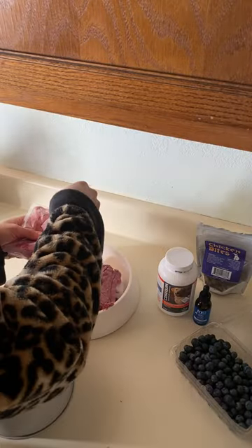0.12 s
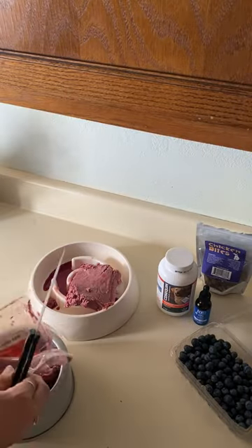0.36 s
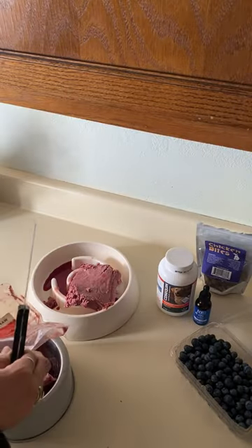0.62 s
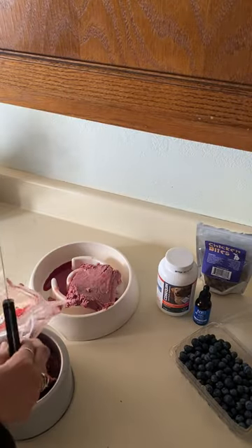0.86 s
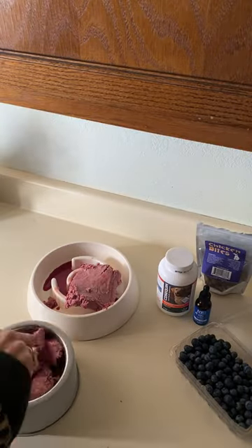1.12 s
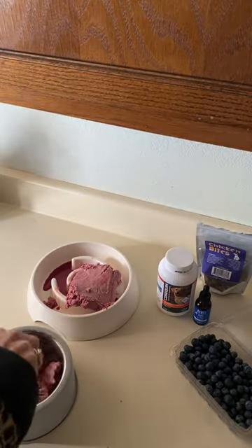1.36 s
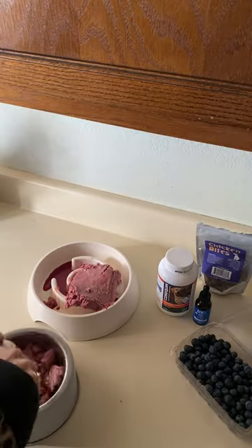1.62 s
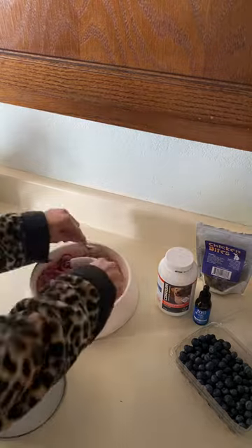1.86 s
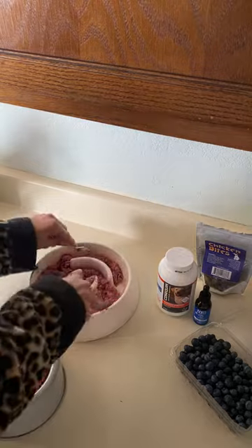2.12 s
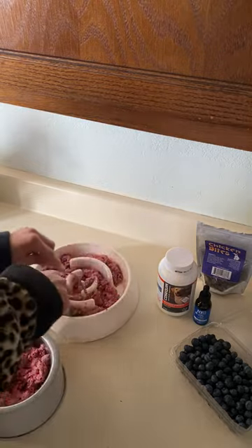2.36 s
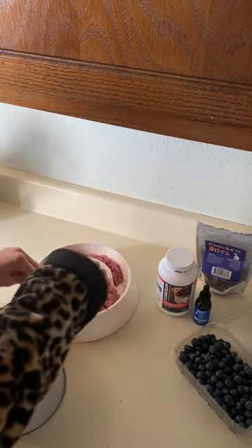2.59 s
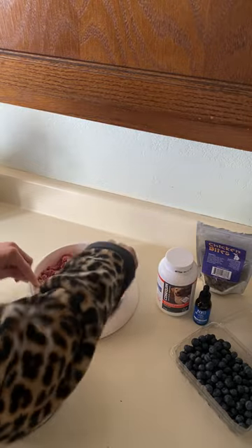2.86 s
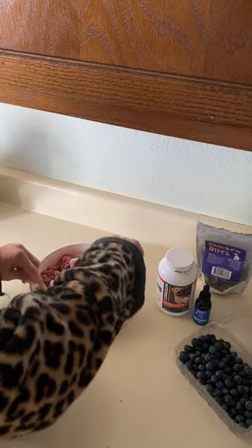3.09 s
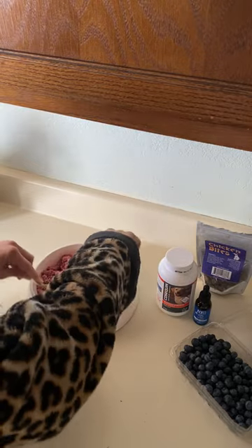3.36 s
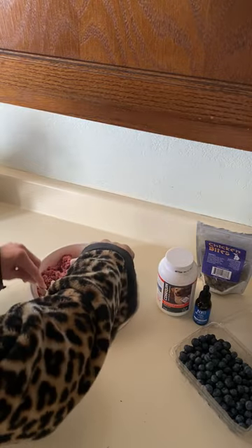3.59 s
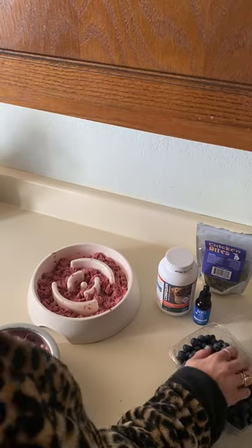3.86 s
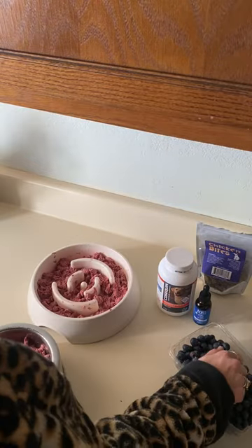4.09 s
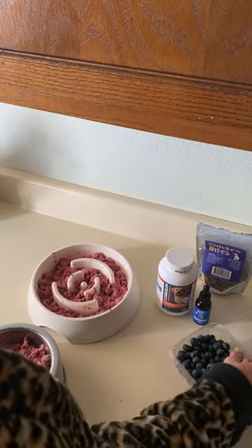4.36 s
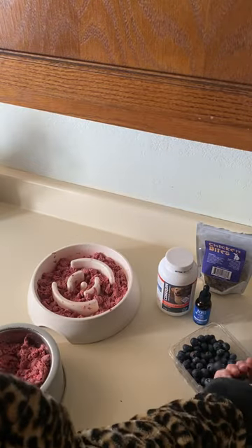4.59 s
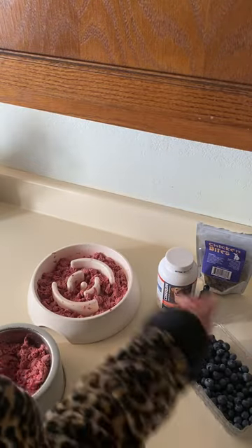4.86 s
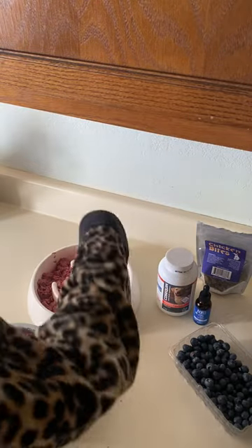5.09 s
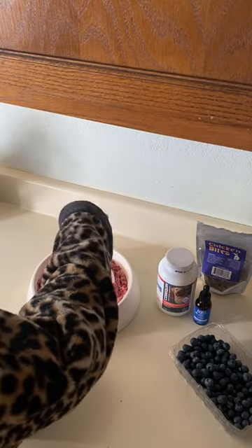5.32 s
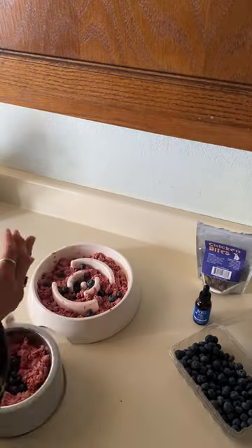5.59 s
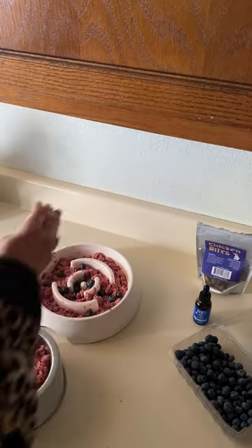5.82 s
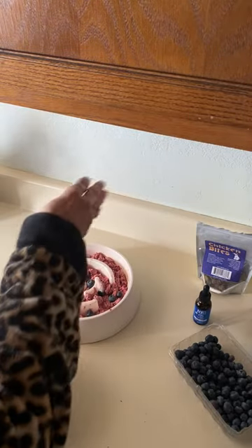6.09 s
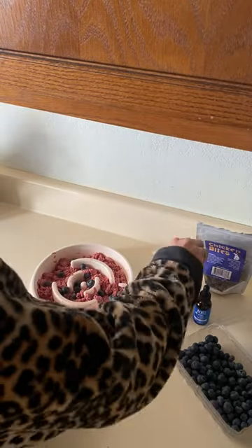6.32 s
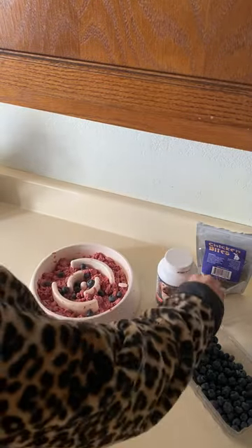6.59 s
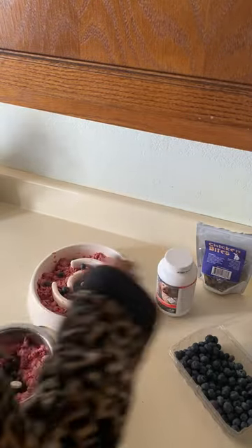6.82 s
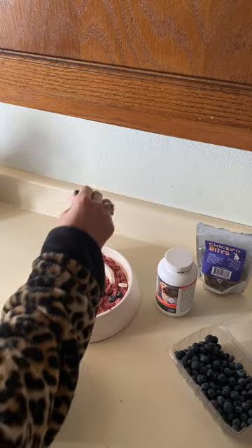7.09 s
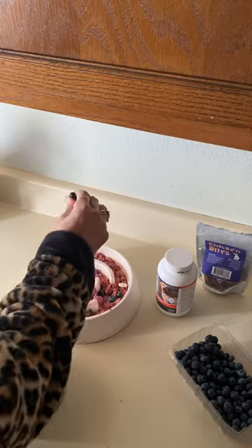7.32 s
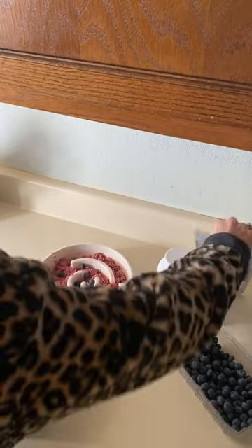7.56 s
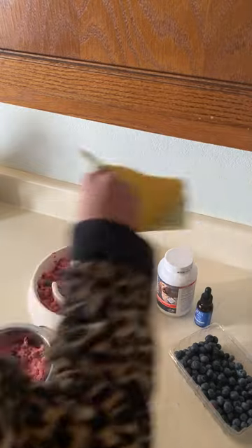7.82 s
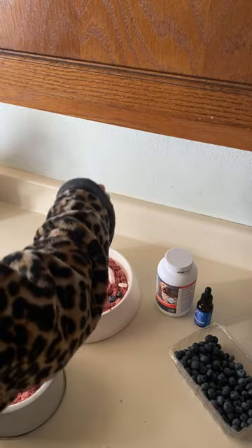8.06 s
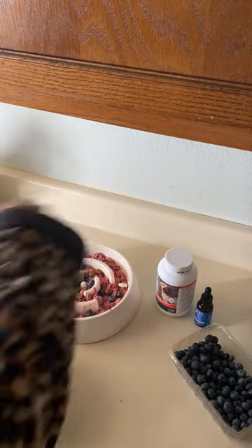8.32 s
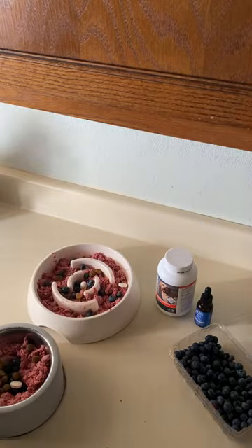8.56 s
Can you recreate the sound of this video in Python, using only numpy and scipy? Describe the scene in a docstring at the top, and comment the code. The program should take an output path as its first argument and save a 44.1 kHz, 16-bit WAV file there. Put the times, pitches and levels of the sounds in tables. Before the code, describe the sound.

Close stereo handling on a kitchen counter: soft food is pressed with small crackles and rings into a steel bowl, then a busy run of heavier thudding knocks in a ceramic bowl. A quiet gap follows, then scattered clacks and rustles of jars and pouches. A low appliance hum wavers and jumps in level; a waiting dog whistles faintly through its nose.

```python
"""Food is broken up and pressed into a steel, then a ceramic bowl on a kitchen counter, close to the microphone;
jars and pouches follow. Presses and rubs are streams of tiny contacts, knocks are sudden noise bursts with
a crack; both ring the object in hand, and a dull tail of the kitchen surrounds them.
A waiting dog whistles faintly through its nose (gliding tones); behind it an appliance hums (two wavering
lines) over room noise, rumble and dull thumps through the counter. The microphone is stereo and hisses."""
import sys
import numpy as np
from scipy import signal
from scipy.fft import rfft, irfft, next_fast_len
from scipy.io import wavfile
from scipy.ndimage import uniform_filter1d, map_coordinates

SR = 44100
rng = np.random.default_rng(int(sys.argv[2]) if len(sys.argv) > 2 else 0)


def wrap_up_sound(samples):
    """Save the sound to the file named by the first command line argument, as 16-bit audio."""
    columns = np.atleast_2d(samples).T
    # keep every value between -1 and 1, then stretch to whole-number steps
    tamed = np.clip(columns, -1, 1)
    steps = np.round(tamed * 32767).astype(np.int16)
    wavfile.write(sys.argv[1], SR, steps)


def nominal_scale(level):
    """Amplitude ratio for a level in decibels (scalar or array-like)."""
    x = np.asarray(level, float) / 20
    return 10 ** x


N = 383214   # samples
SIZE = next_fast_len(N + SR // 2)
HZ = np.fft.rfftfreq(SIZE, 1 / SR)
RING = 4096   # longest ringing of an object, in samples
RING_HZ = np.fft.rfftfreq(RING, 1 / SR)

RISE_DB, FALL_DB = 28, 30.5   # depth of swell and fall
RISE_BEND, FALL_BEND = 1.6, 1.07   # above 1 rounds the top
GRIP_S, LET_GO_S = 0.0078, 0.052   # rise and fall of a rub
DULLING_DB = 9   # scratch lost over the fall

# presses that swell and die away:
# (peak time [s], rise [s], fall [s], body level at the peak [dB], scratch before dulling [dB re body])
PRESSES = [(0.018, 0.036, 0.11, -63, -11), (0.179, 0.034, 0.049, -49, 0), (0.251, 0.028, 0.16, -66, -8.5),
           (0.423, 0.055, 0.078, -60.5, -6.5), (1.06, .015, 0.19, -64.5, -14), (1.15, 0.023, 0.14, -75, -3),
           (1.299, 0.046, 0.2, -39.5, 2), (1.592, 0.031, 0.24, -49, -11.5),
           (1.782, 0.029, 0.11, -51.5, -7.5), (1.864, 0.028, 0.11, -40.5, -7),
           (2.033, 0.04, 0.057, -37.5, -3), (2.779, 0.027, 0.11, -26, -13),
           (2.937, 0.031, 0.14, -31.5, -13), (3.102, 0.019, 0.095, -27.5, -13.5),
           (3.278, 0.036, 0.096, -26, -12.5), (3.461, 0.028, 0.097, -25.5, -15.5),
           (3.622, .035, .08, -44, 10), (3.643, .03, 0.086, -26, -17), (3.803, 0.025, 0.11, -33.5, -4),
           (5.424, 0.041, 0.17, -57.5, -35), (6.026, 0.029, .1, -63, -21.5),
           (6.157, 0.017, 0.059, -46.5, 11), (6.676, 0.041, 0.11, -34.5, -21.5),
           (7.03, .03, 0.054, -72.5, -30.5), (7.393, .03, 0.08, -78.5, 12), (7.629, 0.056, 0.1, -46, 2),
           (8.347, .03, 0.16, -55.5, 4.5), (8.57, 0.066, 0.15, -43, -0.1)]
# steady rubbing and rustling:
# (start time [s], length [s], body level [dB], scratch before dulling [dB re body])
RUBBINGS = [(1.207, 0.0548, -59.5, -5), (1.276, .02, -43.5, -4.5), (1.425, 0.14, -80, 1),
            (1.865, 1.954, -55.5, -18.5), (2.151, 0.076, -42.5, -4.5), (2.254, 0.14, -38, -10.5),
            (2.541, 0.034, -34, 0), (2.597, 0.041, -35, -18.5), (3.934, 0.356, -78.5, -4),
            (4.385, 0.21, -84, -0.5), (7.72, .26, -67, -5), (8.064, 0.057, -64, -16)]


def gestures():
    """Start [s], body [dB] and scratch [dB re body] of each press and rub: the hand bears down, then lets go."""
    for peak_s, rise_s, fall_s, db, scratch_db in PRESSES:
        t = np.arange(-min(1.3 * rise_s, peak_s), 1.4 * fall_s, 1 / SR)
        ahead = np.maximum(-t, 0) / rise_s
        fallen = np.maximum(t, 0) / fall_s
        body_db = db - RISE_DB * ahead ** RISE_BEND - FALL_DB * fallen ** FALL_BEND
        yield peak_s + t[0], body_db, scratch_db - DULLING_DB * fallen
    for start_s, length_s, db, scratch_db in RUBBINGS:
        t = np.arange(-GRIP_S, length_s + 1.4 * LET_GO_S, 1 / SR)
        fallen = np.maximum(t - length_s, 0) / LET_GO_S
        body_db = db + RISE_DB * np.minimum(t, 0) / GRIP_S - FALL_DB * fallen
        yield start_s + t[0], body_db, scratch_db - DULLING_DB * fallen


# the spot under the hand: (from time [s], hollow pitch [Hz],
# clack of a press or rub [dB re the middle of body and scratch], air before trims [dB re scratch])
HAND_SPOTS = [(0.0, 410, -5, 3), (0.13, 1340, -0.5, -13.5), (0.22, 424, -1, 2), (0.38, 2170, -6, -22.5),
              (0.7, 480, 8, -24), (0.85, 410, 0, -7), (1.19, 460, -16, -1.5), (1.25, 1600, 1, -2),
              (1.34, 1820, -8, -4), (1.41, 1200, -5, 1), (1.73, 410, -8, 2.5), (1.83, 455, -9, -8),
              (2.13, 1800, -1, -10.5), (2.24, 1300, -0.8, -12.5), (2.42, 1220, 0, -9.5),
              (2.52, 2510, -1, -6.5), (2.74, 1020, -3.5, -5.5), (3.23, 650, -6, -8),
              (3.33, 1230, -0.5, -12.5), (3.42, 660, -4, -8), (3.55, 4255, -19.5, -6),
              (3.6, 655, -18, -7.5), (3.66, 975, -2.5, -9), (3.75, 4300, -14, -6), (3.92, 423, -3, -0.3),
              (5.3, 598, -9, -7), (5.95, 419, 1, 9), (6.12, 5070, 0, -27.5), (6.19, 2350, -2.5, -20),
              (6.6, 1017, 1, -11), (6.95, 418, -5.5, 24), (7.3, 2130, 6.5, -9), (7.5, 2000, 1.5, 1.54),
              (7.7, 430, -0.5, -6.5), (8.04, 2410, 10.5, -12), (8.3, 1900, 6.5, -21.5),
              (8.47, 389.8, -2.5, -2)]


def spot_at(s):
    """Hollow pitch [Hz], clack [dB] and air [dB] of the spot touched at a moment."""
    starts = [row[0] for row in HAND_SPOTS]
    return HAND_SPOTS[max(np.searchsorted(starts, s, "right") - 1, 0)][1:]


THUD_DB, THUD_FOLLOWS = -41.5, 0.97   # thud at a body level of -40 dB; share of the body's swing
THUD_LAG_S = 0.0073   # the heavy bowl answers late
AIR_FOLLOWS = 0.2   # air swings further than scratch by this share of the body's swing


def strokes(per_s, spread_db, lumpy_db):
    """Presses and rubs: a stream of tiny contacts, as strong as the hand presses, with lumps in each range."""
    sizes = nominal_scale(spread_db * np.minimum(rng.exponential(1, N), 4)) * rng.choice([-1, 1], N)
    grains = rms_one(sizes * (rng.random(N) < per_s / SR))
    together = drift(80)
    lumps = nominal_scale(lumpy_db * np.array([together + drift(35) for _ in range(5)]))
    lumps[0] = np.sqrt(lumps[0])   # the heavy bowl evens out the thud
    out = np.zeros((2, N))
    for s, body_db, scratch_db in gestures():
        at = np.arange(round(s * SR), min(round(s * SR) + len(body_db), N))
        hollow_hz, clack_db, air_db = spot_at(s + GRIP_S)
        thud_db = THUD_DB + THUD_FOLLOWS * (body_db + 40) - body_db
        # thud, body, clack, scratch, air
        balance_db = np.array([thud_db, 0 * body_db, scratch_db / 2 + clack_db, scratch_db, scratch_db + air_db])
        pressure = nominal_scale(body_db + balance_db)[:, :len(at)]
        pressure[0] = np.interp(at - THUD_LAG_S * SR, at, pressure[0], left=0)
        pressure[4] *= nominal_scale(AIR_FOLLOWS * (body_db - body_db.max()))[:len(at)]
        force = pressure * lumps[:, at] * signal.windows.tukey(len(at), .1) * grains[at]
        # food and fingers widen the resonances while rubbing
        touch(out, at[0], force, hollow_hz, spot_db=2.5, broad_db=0.5, damping=2.5)
    return out


RATTLE_T60_S = .025   # a short rattle, then a weaker shudder
SHUDDER_DB, SHUDDER_THUD_DB = -12.5, 4   # shudder re rattle; its extra thud
KNOCK_AIR_DB = -1   # a knock has less air than a rub on the same spot

# knocks: (time [s], body strength before the common trim [dB],
# clack [dB re body], scratch [dB re body], shudder t60 [s])
KNOCK_BLOWS = [(0.067, -29, -17.5, -39, .2), (0.403, -51, 9.5, 0.5, .05), (0.478, -62, -24, -25, .05),
               (0.605, -61.5, -32, -3, 0.046), (0.731, -43.5, -6, -19, 0.16), (0.869, -59, 4, -6, 0.15),
               (1.351, -18, 1, 2, 0.15), (1.861, -26.5, -10.5, -1.5, 0.055),
               (2.011, -21.5, -33, -14.5, 0.11), (2.168, -28, -33, -9, 0.057),
               (2.314, -12, -12, -23, 0.067), (2.35, -31.5, 8, -27, .1), (2.434, -18, -10.5, -15, 0.16),
               (2.585, -25.5, -11, 5.5, .1), (2.778, -11.5, -31, -15.5, 0.051),
               (2.979, -15.5, -11.5, -26.5, 0.16), (3.1, -19, -32, -30.5, 0.13),
               (3.277, -19, -30, -23.5, 0.075), (3.339, -6.5, -13.5, -22, 0.14),
               (3.462, -16.5, -26.5, -10.5, 0.064), (3.672, -7, -11, -25, .13), (3.8, -35, -6, -5.5, .06),
               (4.807, -61, -22.5, -7.5, 0.08), (4.994, -64, -26.5, -11, .05),
               (5.416, -42, -28.5, -31.5, 0.088), (6.163, -15.5, -13.5, 1.5, .2),
               (6.197, -35, 19.5, -14.5, 0.11), (6.254, -43.5, 12, 6, 0.22), (6.287, -50, 6, 7, .15),
               (6.36, -60.5, 4, 4, 0.11), (7.755, -48.5, 1, -18, .06), (7.796, -37.5, -25, -27, .05),
               (7.846, -38.5, -9, -9.5, 0.15), (7.896, -43.5, -2, -3.5, 0.041), (7.954, -43.5, -8, -5, .08),
               (8.081, -37.5, 0.5, -15, 0.042), (8.15, -39, 6, -31, 0.13), (8.345, -35, 17.5, 2.5, 0.058),
               (8.578, -26.5, -25, -12.5, .05), (8.671, -23, -14.5, 1, 0.12)]


def knocks(crack_db, thud_db, knock_db):
    """The contact builds up for a moment, cracks, rattles out and shudders on."""
    out = np.zeros((2, N))
    since = np.arange(SR // 4) / SR
    for s, body_db, clack_db, scratch_db, shudder_t60_s in KNOCK_BLOWS:
        noise = rng.standard_normal(len(since)) * (1 - np.exp(-since / .002))
        blow = noise * nominal_scale(-60 * since / RATTLE_T60_S)
        blow *= 1 + 0.29 * np.exp(-since / 0.00053)   # extra weight in the first moments
        blow[50] = nominal_scale(crack_db)   # the crack is one sample, about 1 ms in
        heavier_db = np.array([[SHUDDER_THUD_DB], [0], [0], [0], [0]])
        shudder = noise * nominal_scale(SHUDDER_DB - 60 * since / shudder_t60_s + heavier_db)
        hollow_hz, _, air_db = spot_at(s)
        air_db = scratch_db + air_db + KNOCK_AIR_DB
        strength = nominal_scale(knock_db + body_db + np.array([[thud_db], [0], [clack_db], [scratch_db], [air_db]]))
        force = strength * (blow + shudder)
        # a knock leaves the resonances sharper than a rub
        touch(out, round(s * SR), force, hollow_hz, spot_db=7.5, broad_db=2, damping=1.4)
    return out


SECOND_BOWL_S, JARS_S = 1.99, 3.935   # when the hand moves on

# the objects on the counter, each with its broad colour: (frequency [Hz], relative level per Hz [dB])
# and its resonances: (frequency [Hz], width before damping [Hz], level before damping and spot [dB])
STEEL_BOWL_COLOUR = [(18, -46.5), (30, -16.5), (467, -1.5), (1510, -10.5), (1870, -9), (2990, -19),
                     (8950, -22.5), (15500, -33)]
STEEL_BOWL_RESONANCES = [(460, 34, 1), (887, 56, 3), (2050, 55, -6), (3400, 73, -7), (4170, 110, -3.5),
                         (5440, 73, -2), (6334, 150, -7.5), (7700, 18, -8), (9500, 97, -15),
                         (11120, 230, -10.5)]
CERAMIC_BOWL_COLOUR = [(18, -34), (30, -4), (546, -10.5), (673, -3.5), (767, -7.5), (1020, -5.5),
                       (1770, -19), (5740, -26.5), (15500, -35.5)]
CERAMIC_BOWL_RESONANCES = [(108, 25, 0.5), (430, 50, -4.5), (700, 31, -11), (1024, 40, -5),
                           (2060, 180, -14.5), (2410, 60, -8.5), (2530, 49, -13.5), (3500, 46, -29),
                           (3980, 34, -11), (5630, 180, -18), (5680, 390, -13.5), (10655, 1400, -18)]
JARS_COLOUR = [(18, -46.5), (30, -5.5), (432, -6), (492, 4), (1050, 5), (4660, -16.5), (5040, -20),
               (15500, -44)]
JARS_RESONANCES = [(436, 60, 10), (637, 25, 12.5), (1390, 92, -7.5), (1640, 110, -2), (2210, 170, -2.5),
                   (2650, 11, -14), (3010, 16, -19.5), (3450, 71, -15), (5330, 47, -5.5)]


def object_in_hand(s):
    """Colour and resonances of what is touched: steel bowl, ceramic bowl, then jars and pouches."""
    if s <= SECOND_BOWL_S:
        return STEEL_BOWL_COLOUR, STEEL_BOWL_RESONANCES
    if s <= JARS_S:
        return CERAMIC_BOWL_COLOUR, CERAMIC_BOWL_RESONANCES
    return JARS_COLOUR, JARS_RESONANCES


def ranges(edges_hz=(400, 1500, 2800, 7000)):
    """Power shares of five ranges: thud, body, clack, scratch, air."""
    below = [0] + [1 / (1 + (RING_HZ / hz) ** 12) for hz in edges_hz] + [1]
    return np.array([high - low for low, high in zip(below, below[1:])])


def ring_of(at, hollow_hz, spot_db, broad_db, damping):
    """Impulse response of the object in each range, energy 1; every spot favours other resonances."""
    colour, resonances = object_in_hand(at / SR)
    hz, width_hz, db = np.transpose(resonances)[:, :, None]
    favour, detune = rng.standard_normal((2, len(resonances), 1))
    damped_db = 1.2 * damping * np.log2(1 + hz / 2000)
    height = nominal_scale(2 * (db + spot_db * np.minimum(favour, 1) - damped_db))
    away = 2 * (RING_HZ - hz * (1 + .02 * damping * detune)) / (damping * width_hz)
    peaks = height / (1 + away ** 2) ** 2
    power = nominal_scale(2 * (over_hz(colour, RING_HZ) + broad_db)) + peaks.sum(axis=0)
    # the hollow pitch adds 8 dB re the power already there
    power = power * (1 + nominal_scale(2 * 8) * np.exp(-(np.log((RING_HZ + 1) / hollow_hz) / 0.062) ** 2))
    response = causal(np.sqrt(power * ranges()))
    return response / np.linalg.norm(response, axis=1, keepdims=True)


# balance of the near sounds at the microphone: (frequency [Hz], left minus right [dB])
NEAR_BALANCE = [(60, 0.0), (180, 0.0), (550, 3.0), (1650, 0.5), (4970, -0.5), (15000, 0.0)]


def touch(add, at, force, hollow_hz, spot_db, broad_db, damping):
    """One touch: the force of each range rings the object in hand, heard close by at both microphone ports."""
    response = ring_of(at, hollow_hz, spot_db, broad_db, damping)
    sound = signal.fftconvolve(force, response, axes=1).sum(axis=0)
    # counter and wall close by reach the two ports differently
    alike = likeness(RING_HZ)
    differing = np.sqrt((1 - alike) / 2) * dying_noise(0.0087, RING) * [[1], [-1]]
    ports = np.sqrt((1 + alike) / 2) + differing
    ports = irfft(ports * nominal_scale(over_hz(NEAR_BALANCE, RING_HZ) / 2 * [[1], [-1]]), RING)
    # shifted to keep the part ahead of time zero, then shifted back
    ports = np.roll(ports, RING // 4, axis=1)[:, :RING * 5 // 8]
    heard = signal.fftconvolve(sound[None], ports, axes=1)[:, RING // 4:]
    add[:, at:at + heard.shape[1]] += heard[:, :N - at]


def kitchen(near, t60, wall_hz):
    """The kitchen's dull, dying cloud of reflections, alike at both ports in the bass."""
    alike = likeness(HZ)
    common = np.sqrt(1 + alike) * dying_noise(t60, SIZE)
    differing = np.sqrt(1 - alike) * dying_noise(t60, SIZE) * [[1], [-1]]
    walls = 1 / (1 + 1j * HZ / wall_hz)   # treble is lost
    return irfft(rfft(near.mean(axis=0), SIZE) * (common + differing) * walls, SIZE)[:, :N]


# the dog's nasal whistles: (start time [s], length [s], first pitch [Hz], last pitch [Hz],
# rms level before flutter and left-right balance [dB])
NOSE_WHISTLES = [(0.215, 0.17, 5750, 5070, -88), (1.633, 0.059, 4800, 4770, -73),
                 (1.703, 0.065, 7500, 7400, -83), (6.42, 0.066, 5930, 5680, -84),
                 (6.522, 0.18, 6900, 7430, -88), (6.69, .15, 7900, 6800, -89)]


def whistles():
    """The dog's nose: a slightly rough, thin tone that glides, a little to the left."""
    out, waver, flutter = np.zeros(N), drift(120), drift(120)
    for s, length_s, first_hz, last_hz, db in NOSE_WHISTLES:
        at = np.arange(round(s * SR), round((s + length_s) * SR))
        pitch_hz = np.linspace(first_hz, last_hz, len(at)) + 40 * waver[at]
        phase = 2 * np.pi * np.cumsum(pitch_hz) / SR
        level = np.sqrt(2) * nominal_scale(db + 2.4 * flutter[at])
        out[at] = level * np.sin(phase) * signal.windows.tukey(len(at), .6)
    return out * nominal_scale([[1.5], [-1.5]])


# background, one table for each stretch between jumps in level:
# (time [s], hum level before a 3 dB lift [dB])
BACKGROUND_STRETCHES = [
    [(0.0, -53), (0.21, -56.5), (0.3, -59), (1.14, -56.5), (1.83, -57.5), (2.9, -56.5), (3.93, -55.5)],
    [(3.93, -61), (4.226, -68), (4.864, -76.5), (5.06, -67), (5.298, -71.5), (5.454, -75.5), (5.68, -68.5)],
    [(5.68, -58), (6.4, -56.5), (6.86, -58.5), (7.06, -56.5)],
    [(7.06, -67), (7.55, -75.5)],
    [(7.55, -56), (7.964, -56.5), (8.45, -64.5), (8.69, -59.5)],
]


def background_level():
    """Level of the background [dB]: it drifts within a stretch and jumps between stretches."""
    level_db = np.full(N, -80.)
    for stretch in BACKGROUND_STRETCHES:
        s, db = np.transpose(stretch)
        at = np.arange(max(round(s[0] * SR), 0), min(round(s[-1] * SR), N))
        level_db[at] = np.interp(at / SR, s, db)
    return uniform_filter1d(level_db, size=400)


# room noise and rumble at a background level of -57 dB, and their shares of its swing
NOISE_DB, NOISE_FOLLOWS, RUMBLE_DB, RUMBLE_FOLLOWS = -60.5, .55, -62.5, .9
THUMP_S = 0.045   # time from a thump's peak to 1/e

# appliance hum: (frequency [Hz], relative level [dB])
HUM_LINES = [(204.6, -71.5), (236.9, -71.5)]
# colour of the room noise: (frequency [Hz], relative level per Hz [dB])
NOISE_COLOUR = [(150, -40.5), (260, -7.5), (412, -8.5), (457, -16.5), (542, -11), (635, -16.5),
                (696, -14.5), (1680, -34.5), (6000, -58), (7800, -64), (13200, -120)]
# colour of rumble and thumps: (frequency [Hz], relative level per Hz [dB])
RUMBLE_COLOUR = [(12, -54), (20, -12.5), (59, -16), (91, -5.5), (171, -14), (190, -12.5), (250, -26.5),
                 (420, -120)]
# dull thumps through the counter: (time [s], level before wavering [dB])
COUNTER_THUMPS = [(0.08, -48), (1.87, -49.5), (5.39, -58.5), (5.906, -65), (8.12, -61.5)]


def room_tone():
    """Two wavering hum lines that beat, over room noise, rumble and thumps."""
    t = np.arange(N) / SR
    level_db = background_level()
    swing_db = level_db + 57
    hum = np.zeros(N)
    for hz, db in HUM_LINES:
        line_level = nominal_scale(db + 3.2 * drift(18) + 2.0 * drift(4.9))
        hum += line_level * np.sin(2 * np.pi * hz * t + 1.8 * drift(15))
    hum = nominal_scale(level_db + 3.0) * rms_one(hum)
    noise = nominal_scale(NOISE_DB + NOISE_FOLLOWS * swing_db + 1.0 * drift(36)) * coloured(NOISE_COLOUR)
    rumble_level = nominal_scale(RUMBLE_DB + RUMBLE_FOLLOWS * swing_db)
    for s, db in COUNTER_THUMPS:
        rumble_level += nominal_scale(db) * np.exp(-((t - s) / THUMP_S) ** 2)
    rumble = rumble_level * nominal_scale(3.0 * drift(30)) * coloured(RUMBLE_COLOUR)
    return hum + noise + rumble


# the two microphone ports: (frequency [Hz], left-right likeness [-1 to 1])
PORT_LIKENESS = [(60, 0.98), (130, 0.96), (290, 0.75), (640, 0.31), (1410, 0.31), (3100, 0.12),
                 (6820, 0.16), (15000, -0.48)]


def likeness(hz, less=0):
    """How alike the two microphone ports hear each frequency."""
    return np.clip(over_hz(PORT_LIKENESS, hz) - less, -1, 1)


def coloured(spectrum):
    """Stereo noise of a given colour, alike in the bass only; rms 1."""
    mid, side = rfft(rng.standard_normal((2, SIZE)))
    alike = likeness(HZ, less=.1)
    both = np.sqrt(1 + alike) * mid + np.sqrt(1 - alike) * side * [[1], [-1]]
    return rms_one(irfft(both * nominal_scale(over_hz(spectrum)), SIZE)[:, :N])


def dying_noise(t60, size):
    """Spectrum of a cloud of reflections that dies in t60 [s], energy 1."""
    cloud = rng.standard_normal(size) * nominal_scale(-60 * np.arange(size) / (t60 * SR))
    return rfft(cloud / np.linalg.norm(cloud))


def causal(gain):
    """Minimum-phase impulse response of a magnitude: nothing rings before the touch."""
    cepstrum = irfft(np.log(gain + 1e-9), RING)
    cepstrum[:, 1:RING // 2] *= 2
    cepstrum[:, RING // 2 + 1:] = 0
    return irfft(np.exp(rfft(cepstrum)), RING)


def drift(rate):
    """Slow smooth chance, about rate turns a second, spread about 1."""
    count = int(N / SR * rate) + 3
    return map_coordinates(rng.standard_normal(count), [np.linspace(0, count - 1, N)], order=3)


def over_hz(points, hz=HZ):
    """A (frequency [Hz], value) table read at every frequency, along a log axis."""
    at_hz, value = np.transpose(points)
    return np.interp(np.log(hz + 1), np.log(at_hz + 1), value)


def rms_one(x):
    """Scale to rms 1."""
    return x / np.sqrt(np.mean(np.abs(x) ** 2) + 1e-20)


def scene():
    """Handling close by and its tail in the kitchen, then the dog and the background."""
    near = strokes(per_s=4500, spread_db=2.0, lumpy_db=2.5)
    near = near + knocks(crack_db=10.5, thud_db=-6, knock_db=-3)
    tail = nominal_scale(-11) * kitchen(near, t60=0.11, wall_hz=5060)
    return near + tail + whistles() + room_tone()


def low_pass(x):
    """Removes everything above the highest recorded frequency."""
    return signal.sosfilt(signal.butter(12, 15750, fs=SR, output="sos"), x)


# colour of the microphone hiss: (frequency [Hz], relative level per Hz [dB])
HISS_COLOUR = [(1180, -32), (2000, -2.5), (2410, -6), (3040, -2), (3400, 0.5), (15500, -2)]


def record(dry):
    """The microphone loses the deepest bass and adds hiss."""
    microphone = signal.butter(2, 35, "high", fs=SR, output="sos")
    hiss = nominal_scale(-88) * coloured(HISS_COLOUR)
    mix = signal.sosfilt(microphone, dry) + hiss
    return low_pass(mix)


dry = scene()
out = record(dry)
wrap_up_sound(out)
```